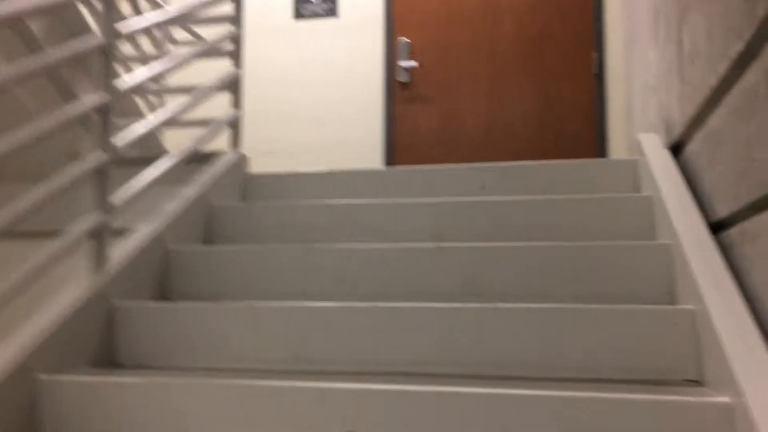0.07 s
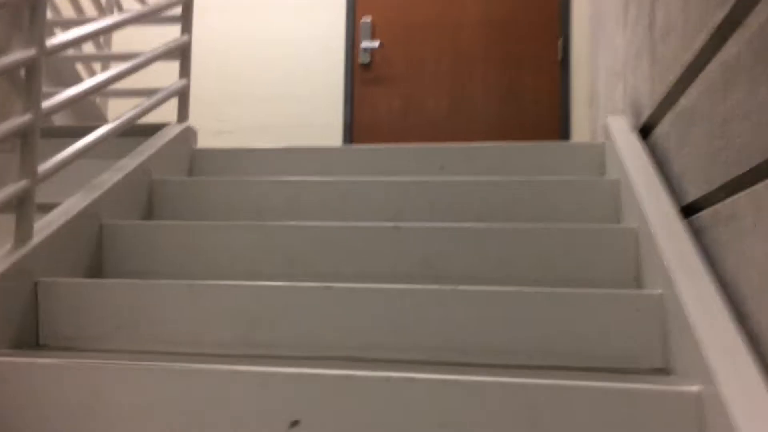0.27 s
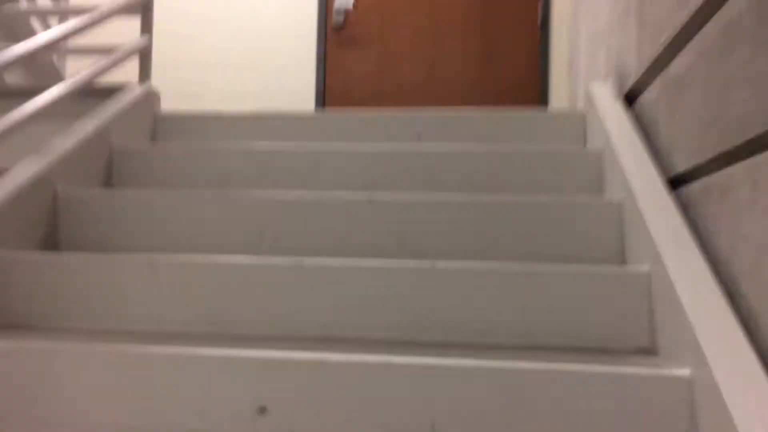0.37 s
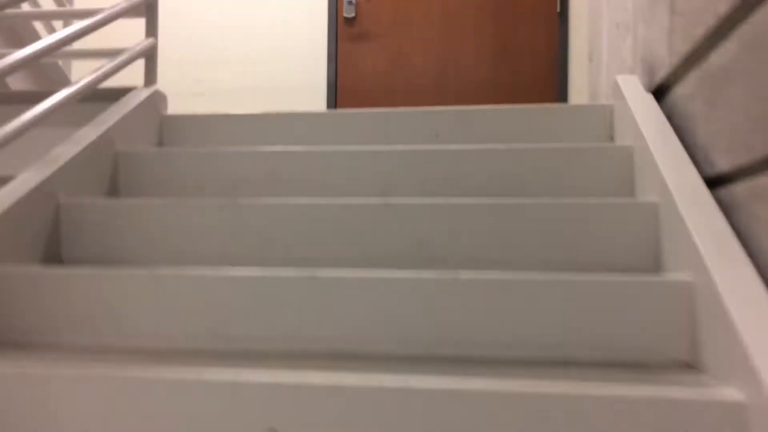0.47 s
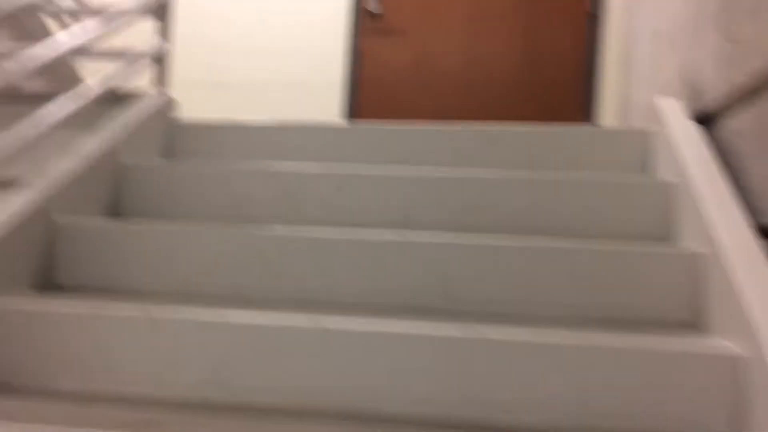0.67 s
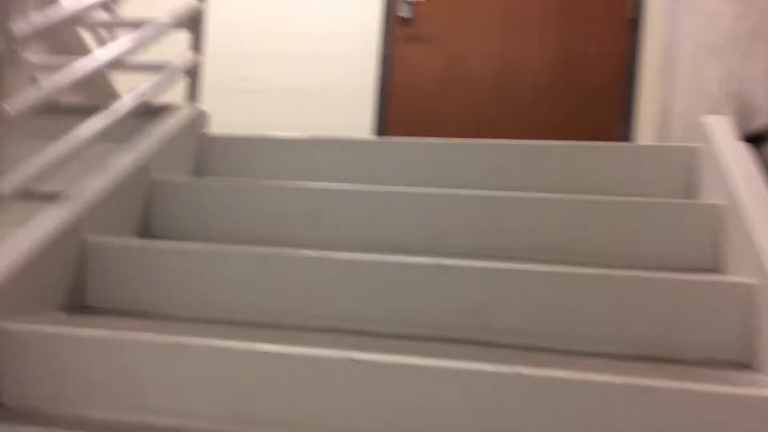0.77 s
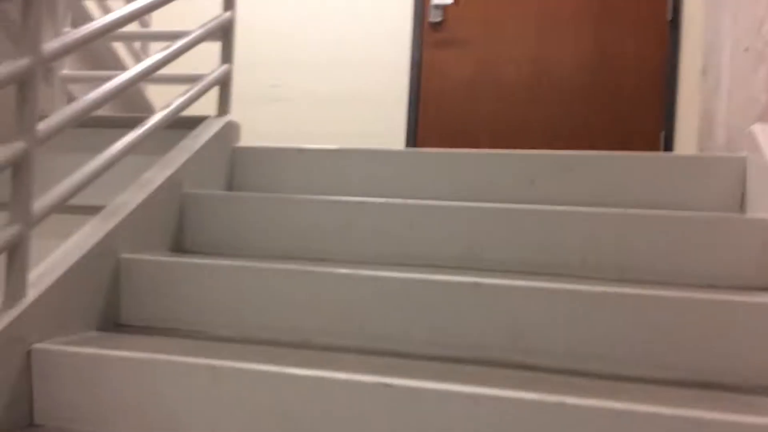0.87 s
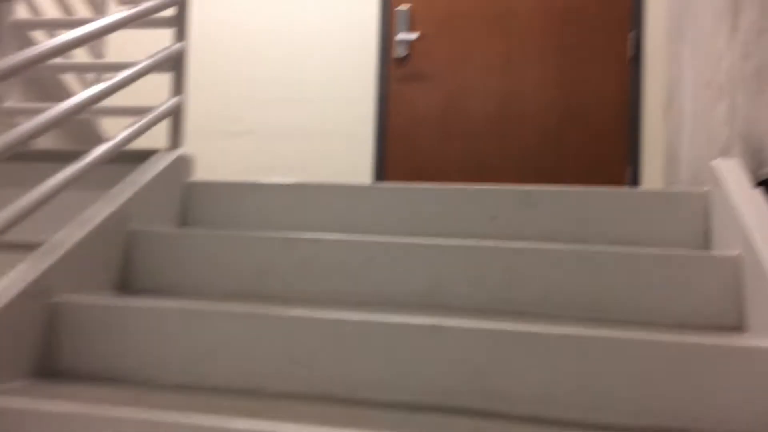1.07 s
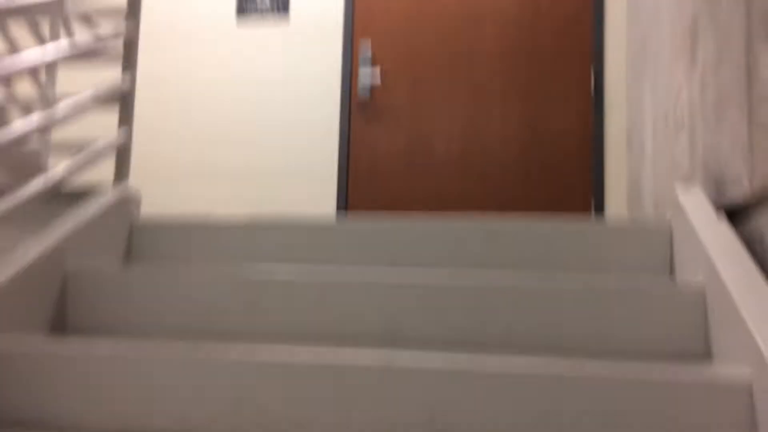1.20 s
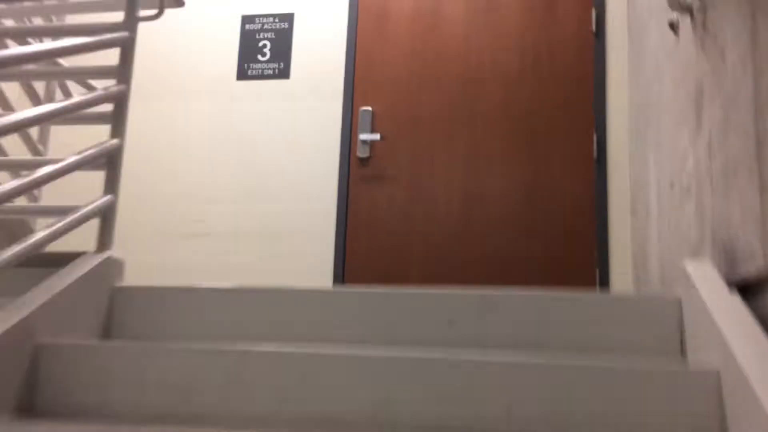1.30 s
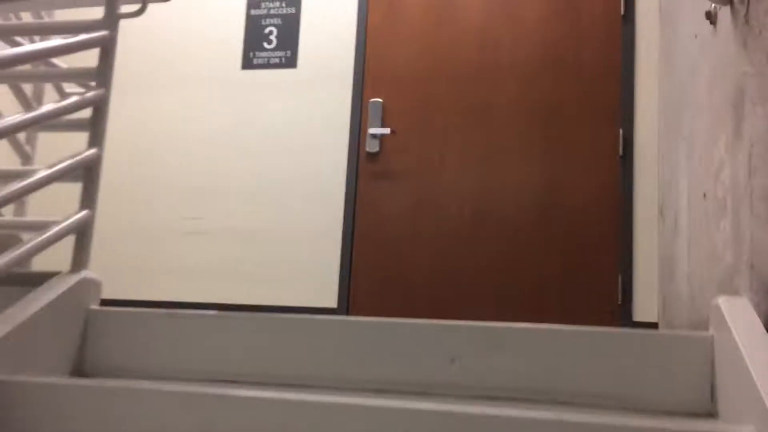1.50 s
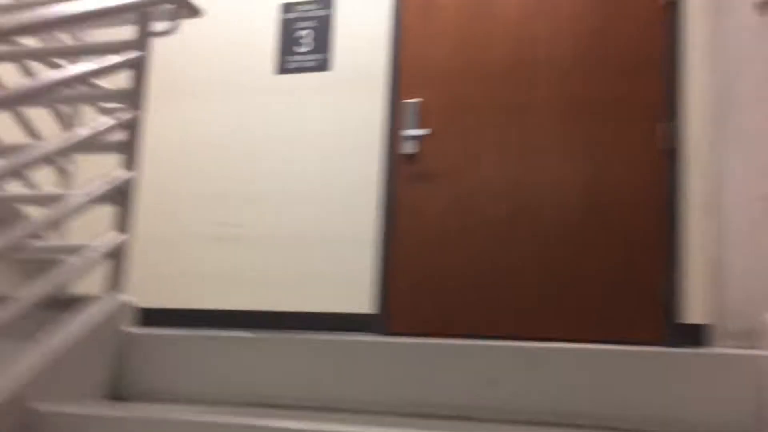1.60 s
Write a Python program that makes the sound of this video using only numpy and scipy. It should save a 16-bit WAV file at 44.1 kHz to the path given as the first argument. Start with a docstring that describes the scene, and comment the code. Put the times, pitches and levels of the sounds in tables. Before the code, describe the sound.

Two footfalls boom on a metal staircase, the first much louder, ringing between hard walls.

```python
"""Two footfalls in a steel stairwell

A heavy stamp, then a lighter step, land on a steel staircase between hard walls.
Each knocks the tread, sets the flight booming and rings on in the shaft.
Under them lie ventilation noise, a low hum that swells, and a soft hiss like moving clothes."""
import sys
import numpy as np
from scipy import signal
from scipy.fft import rfft, irfft
from scipy.io import wavfile
from scipy.ndimage import uniform_filter1d

SR = 44100
rng = np.random.default_rng(int(sys.argv[2]) if len(sys.argv) > 2 else 0)


def wav_out(sig):
    """Save sig, one row per channel (or a flat mono array), as 16-bit PCM at SR to the path in sys.argv[1]."""
    wavfile.write(sys.argv[1], SR, np.round(np.clip(np.atleast_2d(sig).T, -1, 1) * 32767).astype(np.int16))


N = 72765

# the stamp and the step (t/s, knock/dB, thump/dB, shaft and boom/dB, tilt/dB per octave, thump pitch ratio)
FOOTFALLS = [(0.2252, -0.5, -0.5, -1, 0.5, 1.0), (1.261, -14, -11, -15.5, -3.5, 1.09)]
# the tread's short knock (f/Hz before detuning, level/dB, t60/s)
TREAD_MODES = [(139.6, -20, 0.16), (305, -11, 0.058), (746, -14, 0.032), (1104, -7, 0.014),
               (1410, -10, 0.022), (1890, -9.5, 0.024), (2360, -20, 0.042), (3400, -12, 0.01),
               (5720, -25, 0.0097)]
# the dull thump as the body's weight lands (f/Hz before the pitch ratio, level/dB, t60/s)
THUMP_MODES = [(48.6, -30.5, 0.3), (74, -30.5, 0.35), (127.5, -29.5, 0.15), (171.3, -34, 0.23),
               (209.4, -21, 0.2)]
# the long boom of the flight (f/Hz, level/dB, t60/s)
FLIGHT_MODES = [(55.5, -28.5, 0.93), (123.3, -26, 0.68), (224.5, -42.5, 1), (285, -37, 0.55),
                (365.5, -34, 1.12), (796, -32, 0.96)]
# the slap of the sole (f/Hz, level/dB)
SLAP_SPECTRUM = [(40, -4), (300, 7), (520, -18), (1200, -6.5), (2300, -0.5), (3500, -8), (6000, -30.5),
                 (9000, -40), (15000, -55)]
# early reflections off nearby steps and walls (f/Hz, level/dB)
EARLY_SPECTRUM = [(40, -23), (140, 4), (300, 9.5), (500, -0.5), (750, 0.5), (1300, 3.5), (2200, -5.5),
                  (3000, -11.5), (5500, -25.5), (9000, -38), (15000, -49)]
# colour of the shaft's reverb (f/Hz, level/dB)
SHAFT_SPECTRUM = [(25, -14), (50, -5), (130, 0.5), (190, -1), (320, 3), (520, -9), (760, 0.5), (1300, -4),
                  (1550, -3), (2050, -1.5), (2700, -9), (3500, -11.5), (4500, -20.5), (6000, -31),
                  (8000, -39), (15000, -60)]
# decay of the shaft's reverb (f/Hz, t60/s)
SHAFT_DECAY = [(60, 2.9), (150, 0.89), (350, 1.94), (900, 2.31), (2000, 1.67), (3500, 1.63), (6000, 1.45),
               (12000, 0.8)]
# the ventilation's rush (f/Hz, level/dB)
VENT_SPECTRUM = [(20, -32), (40, 5), (65, 4), (125, 4.5), (200, -0.5), (500, -7.5), (1000, -7),
                 (1600, -10.5), (3000, -23.5), (6000, -28), (15000, -37)]
# the hum's swell (t/s, level/dB)
HUM_ENVELOPE = [(0, -58), (.5, -52.5), (.9, -51), (1.05, -51.5), (1.3, -45), (1.45, -53), (1.65, -54)]
# the hiss of clothes (f/Hz, level/dB)
CLOTH_SPECTRUM = [(200, 0), (1500, 5.5), (3500, 5.5), (5200, 1), (6000, 4.5), (7500, 0), (9500, -1.5),
                  (12000, -1), (15000, -3.5)]
# the rise and fall of that hiss (t/s, level/dB)
CLOTH_ENVELOPE = [(0, -58), (.1, -66), (.21, -71), (.34, -65), (.44, -55), (.52, -54), (.66, -63),
                  (.92, -58), (1.08, -55.5), (1.22, -55), (1.3, -50), (1.52, -51), (1.65, -51.5)]


def footfall(knock_db, thump_db, shaft_db, tilt, thump_pitch):
    """The tread knocks, the body's weight thumps, the flight booms and the shaft rings on."""
    knock = tread_knock(tilt)
    thump = ring(THUMP_MODES, tilt, rise_s=0.063, pitch=thump_pitch)
    boom = ring(FLIGHT_MODES, tilt, rise_s=0.026)
    shaft = amp(11.5) * reflections(SHAFT_SPECTRUM, SHAFT_DECAY, tilt, rise_s=0.016)
    return amp(knock_db) * knock + amp(thump_db) * thump + amp(shaft_db) * (shaft + boom)


def tread_knock(tilt, predelay_s=0.001937, early_t60_s=0.27):
    """The sole slaps, the steel tread rings briefly and nearby surfaces answer."""
    knock = ring(TREAD_MODES, tilt, rise_s=0.0012, pitch=0.97)
    add(knock, 0, amp(6) * click(SLAP_SPECTRUM, tilt))
    early = reflections(EARLY_SPECTRUM, [(1, early_t60_s)], tilt, rise_s=predelay_s)
    add(knock, predelay_s, amp(11.5) * early)
    return knock


def ring(modes, tilt, rise_s, pitch=1):
    """A struck body: decaying modes of alternating polarity under a linear attack."""
    t = np.arange(N) / SR
    tone = np.zeros(N)
    for k, (hz, db, t60) in enumerate(modes):
        envelope = amp(db + tilt_db(hz, tilt) - 60 * t / t60)
        tone += (-1) ** k * envelope * np.sin(2 * np.pi * hz * pitch * t)
    return tone * np.minimum(t / rise_s, 1)


def click(spectrum, tilt, size=4096):
    """An impact: a minimum-phase click of a given colour, with unit energy before the tilt."""
    hz = abs(np.fft.fftfreq(size, 1 / SR))
    log_gain = np.log(unit(amp(curve_at(spectrum, hz))) * amp(tilt_db(hz, tilt)))
    minimum_phase = np.exp(np.conj(signal.hilbert(log_gain)))
    return np.fft.ifft(minimum_phase).real


def tilt_db(hz, db_per_octave, corner_hz=660):
    """Treble tilt above a corner: a softer footfall is duller."""
    return db_per_octave * np.log2(np.clip(hz / corner_hz, 1, None))


def reflections(spectrum, decay, tilt, rise_s, slot=8):
    """Hard surfaces return a click as dense echoes that build up, then die band by band."""
    taps = np.zeros(N)
    starts = np.arange(0, N - slot, slot)  # one echo in each slot of samples
    taps[starts + rng.integers(0, slot, len(starts))] = rng.choice([-1, 1], len(starts))
    hz, t, bands = signal.stft(taps, SR, nperseg=256)
    fade = amp(-60 * t / curve_at(decay, hz)[:, None])
    tail = signal.istft(bands * fade, SR)[1][:N]
    tail *= np.minimum(np.arange(N) / SR / rise_s, 1)
    return signal.fftconvolve(tail / np.linalg.norm(tail), click(spectrum, tilt))[:N]


def clothes(flutter_db=1):
    """Cloth brushes as the climber moves: a soft, fluttering hiss."""
    hiss = noise(CLOTH_SPECTRUM)
    flutter = amp(flutter_db * drift(size=400))
    return hiss * flutter * fader(CLOTH_ENVELOPE)


def ventilation(hum_hz=74.7, waver_hz=1.85):
    """A steady bed of air and a low hum that wavers in pitch and swells."""
    hz = hum_hz + waver_hz * drift(size=3000)
    hum = np.sqrt(2) * np.sin(2 * np.pi * np.cumsum(hz) / SR)
    return amp(-47) * noise(VENT_SPECTRUM) + hum * fader(HUM_ENVELOPE)


def noise(spectrum):
    """Steady noise of a given colour."""
    gain = amp(curve_at(spectrum, np.fft.rfftfreq(N, 1 / SR)))
    return unit(irfft(rfft(rng.standard_normal(N)) * gain, N))


def drift(size):
    """A slow random wobble, smoothed twice over `size` samples."""
    return unit(uniform_filter1d(uniform_filter1d(rng.standard_normal(N), size), size))


def amp(db):
    """Decibels to gain."""
    return 10 ** (np.asarray(db) / 20)


def unit(x):
    """Scales to an rms of one."""
    return x / np.sqrt(np.mean(x ** 2) + 1e-20)


def curve_at(points, hz):
    """Reads a table along a log-frequency axis."""
    f, value = np.transpose(points)
    return np.interp(np.log(hz + 1), np.log(f + 1), value)


def fader(points):
    """A gain that rides a (t/s, level/dB) curve."""
    return amp(np.interp(np.arange(N) / SR, *np.transpose(points)))


def add(mix, start_s, sound):
    """Drops a sound into the mix at its cue."""
    part = mix[round(start_s * SR):][:len(sound)]
    part += sound[:len(part)]


def scene():
    """Both footfalls over clothes and ventilation, in mono."""
    mix = clothes() + ventilation()
    for start_s, *settings in FOOTFALLS:
        add(mix, start_s, footfall(*settings))
    return mix[None]


def record(dry, cutoff_hz=15350):
    """A steep low-pass takes off the very top."""
    lowpass = signal.firwin(511, cutoff_hz, window=("kaiser", 9), fs=SR)
    return signal.oaconvolve(dry, lowpass[None], "same")


dry = scene()
out = record(dry)
wav_out(out)
```